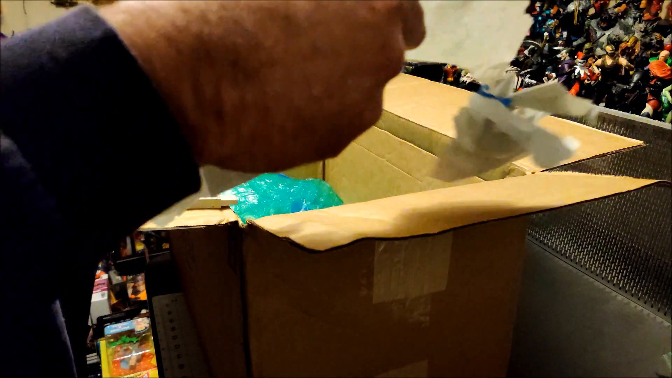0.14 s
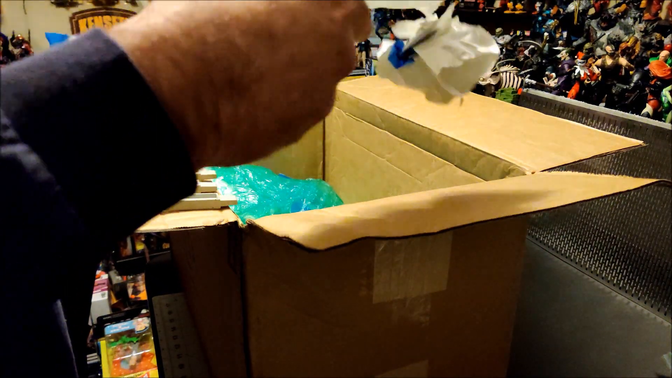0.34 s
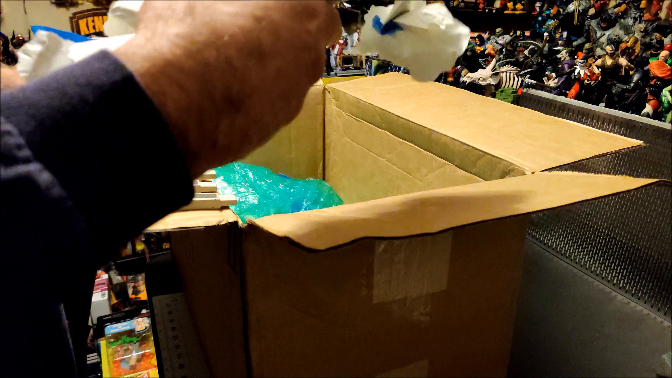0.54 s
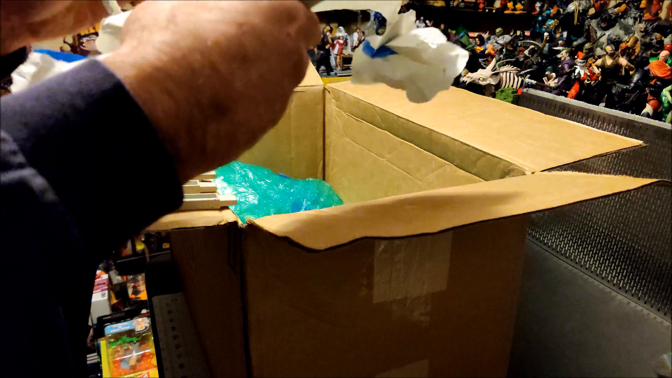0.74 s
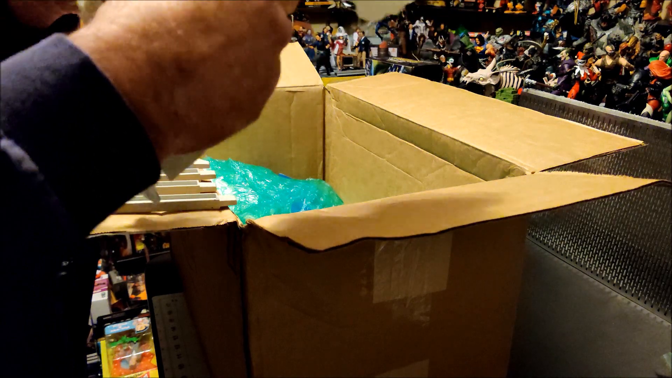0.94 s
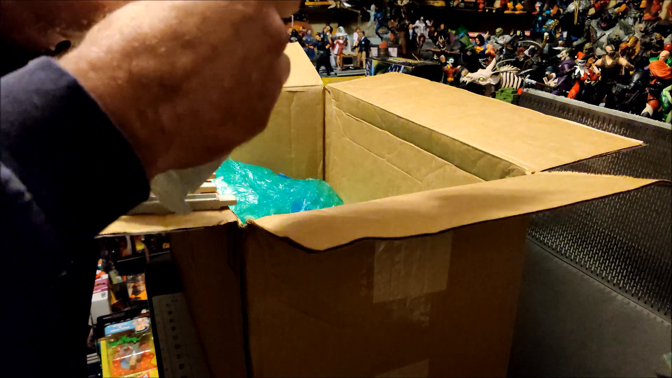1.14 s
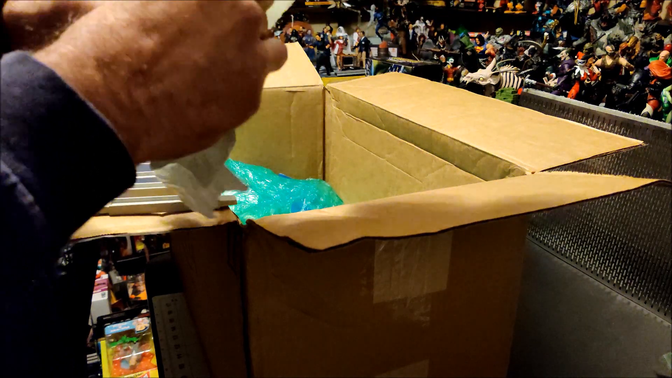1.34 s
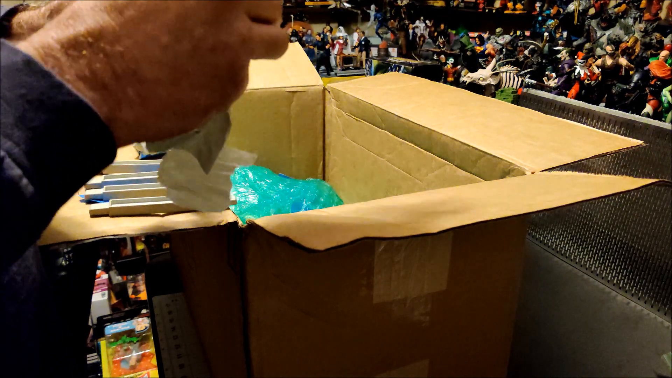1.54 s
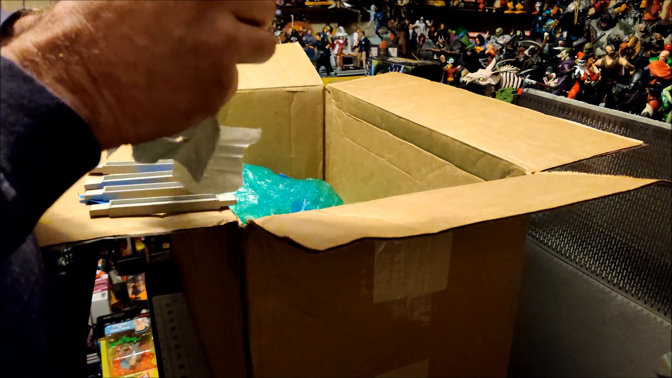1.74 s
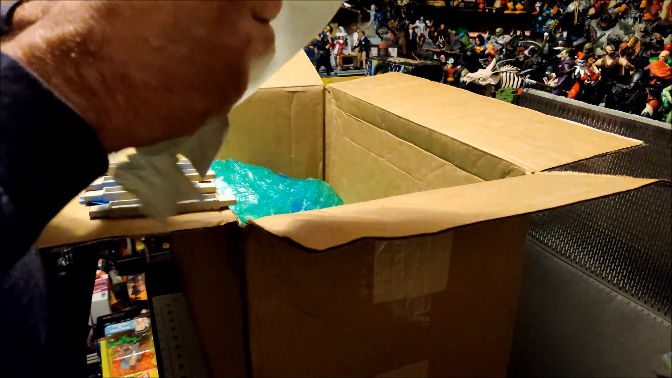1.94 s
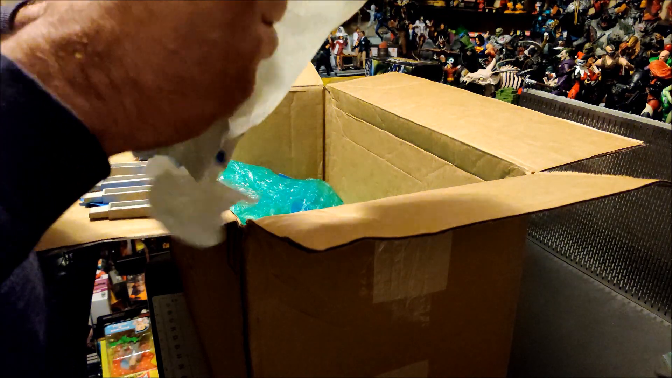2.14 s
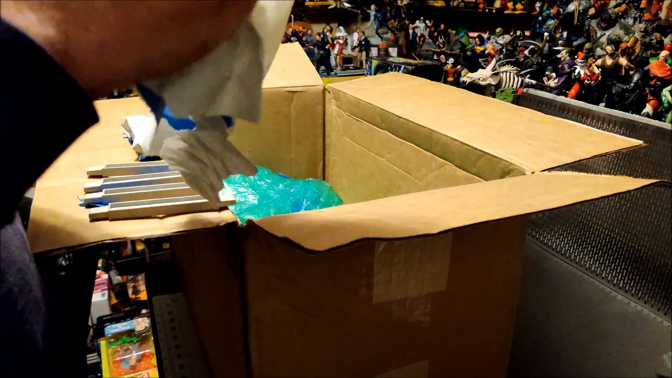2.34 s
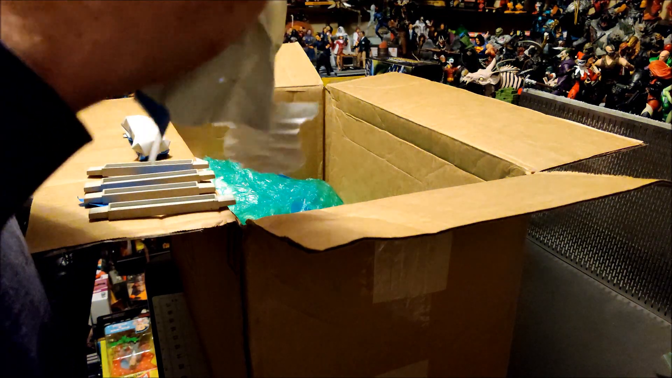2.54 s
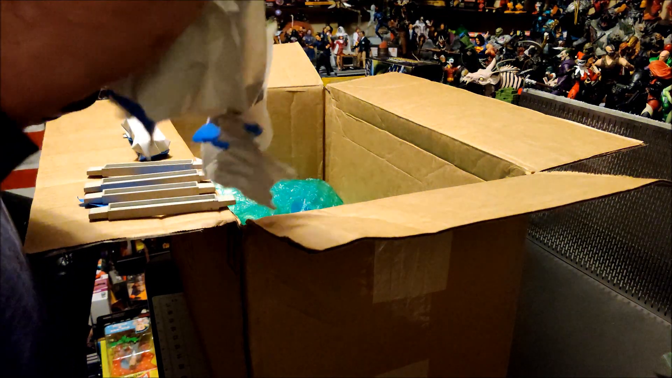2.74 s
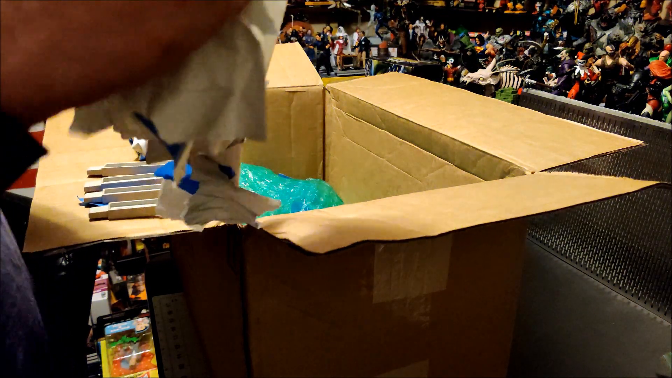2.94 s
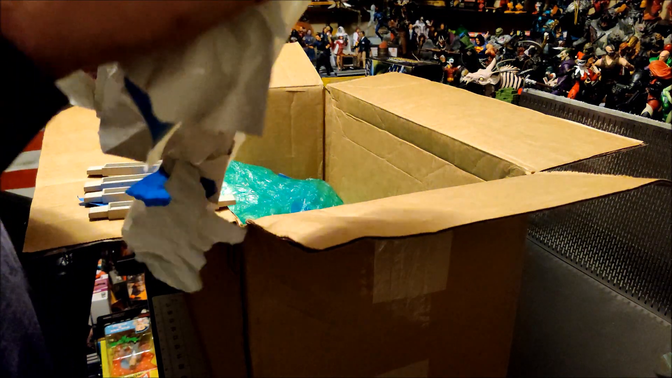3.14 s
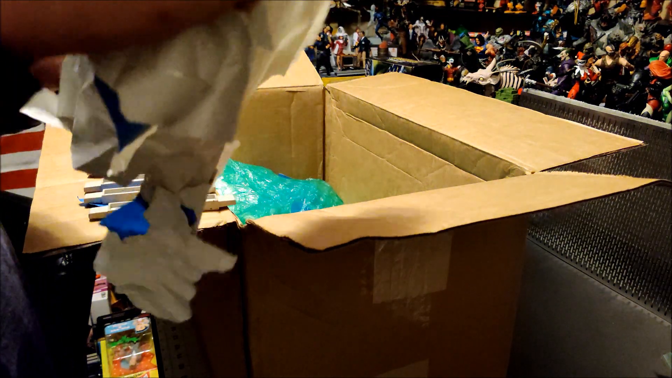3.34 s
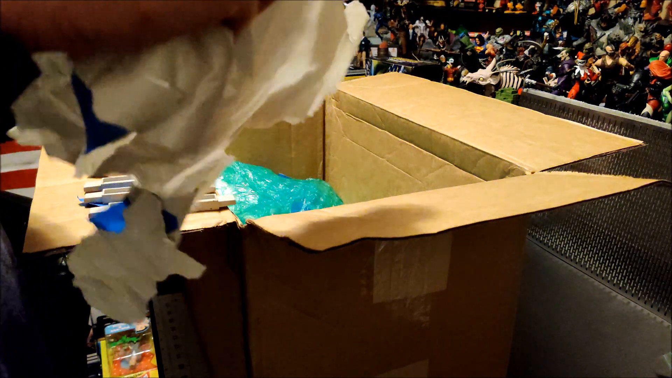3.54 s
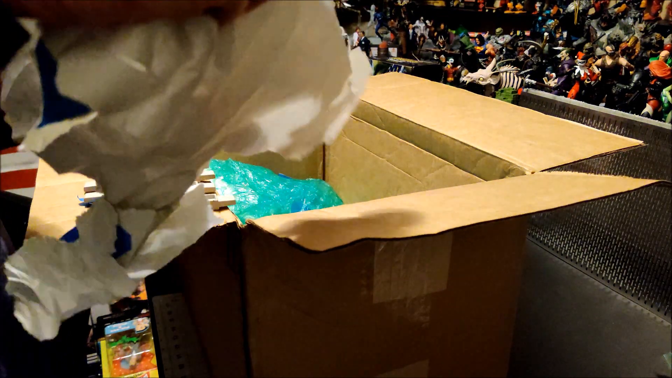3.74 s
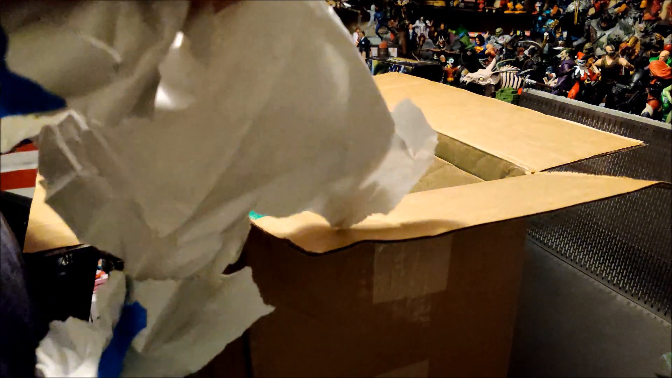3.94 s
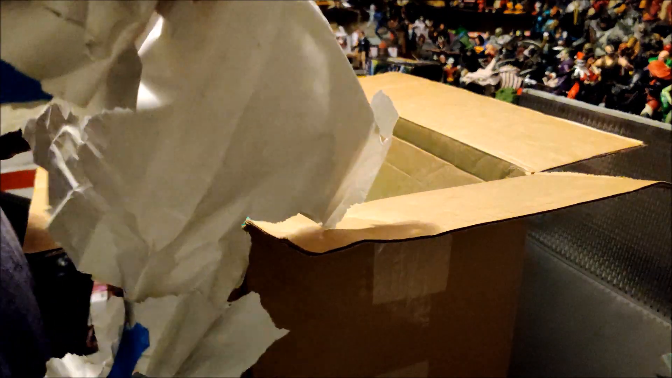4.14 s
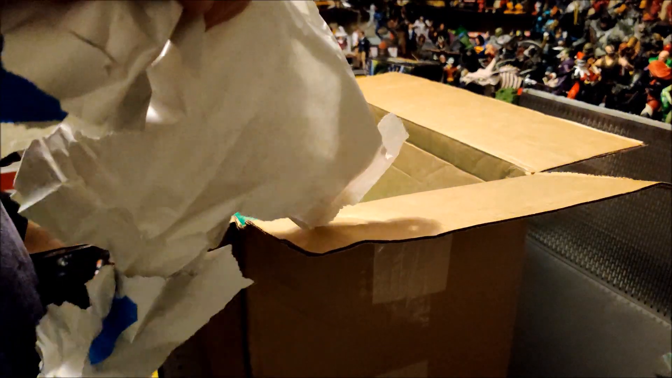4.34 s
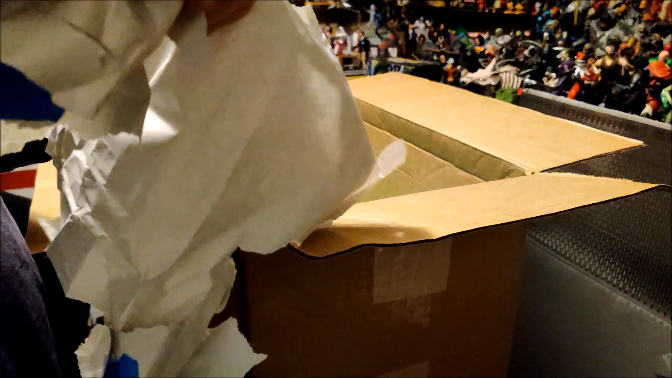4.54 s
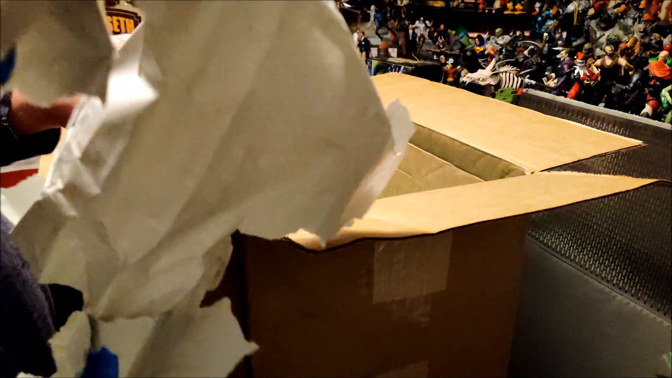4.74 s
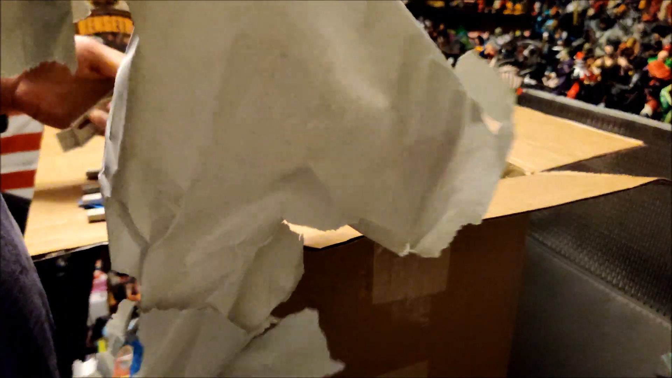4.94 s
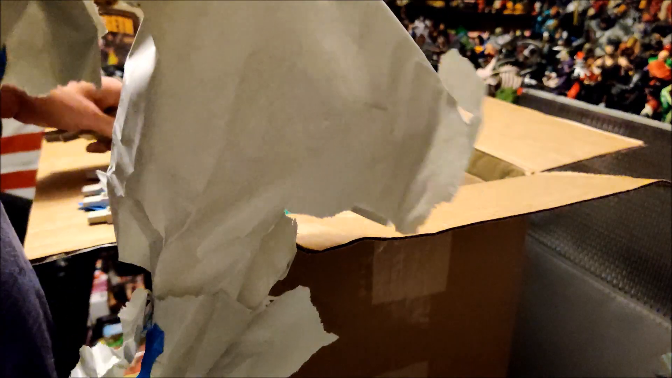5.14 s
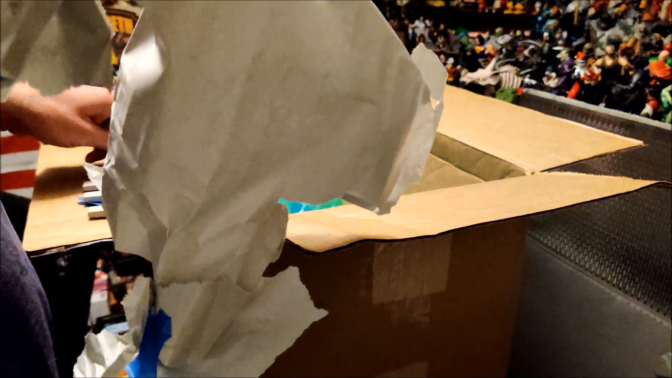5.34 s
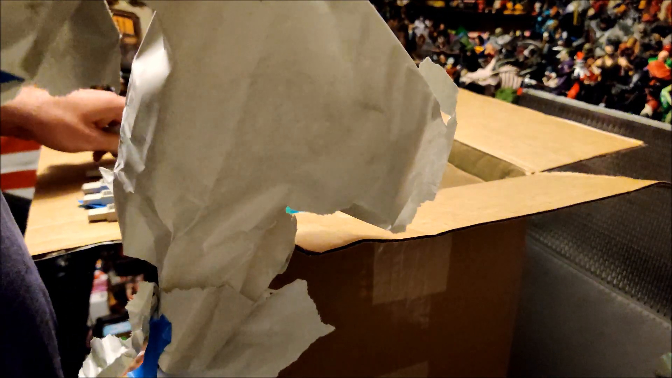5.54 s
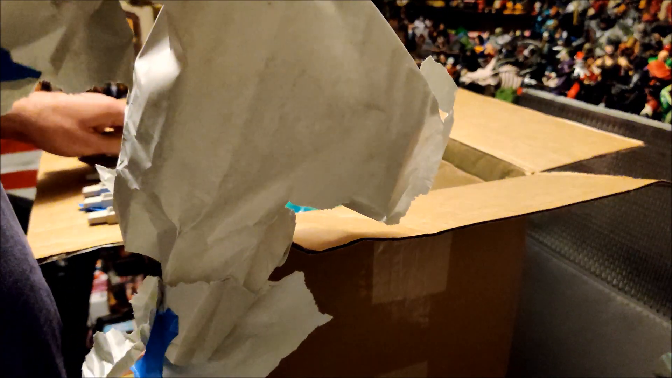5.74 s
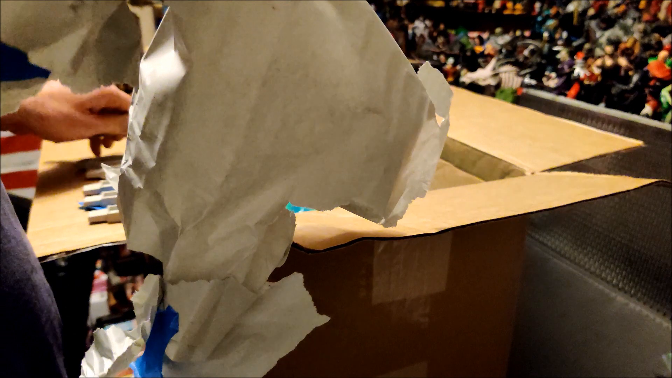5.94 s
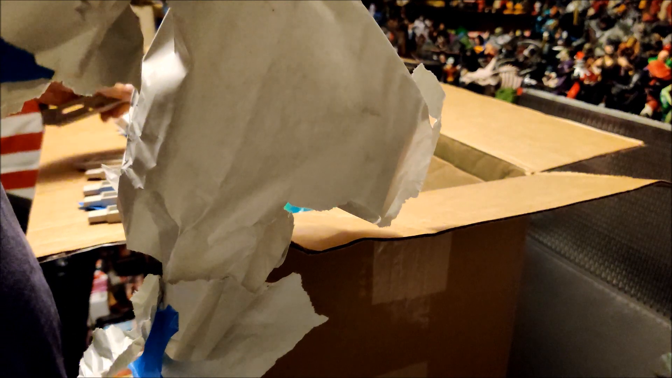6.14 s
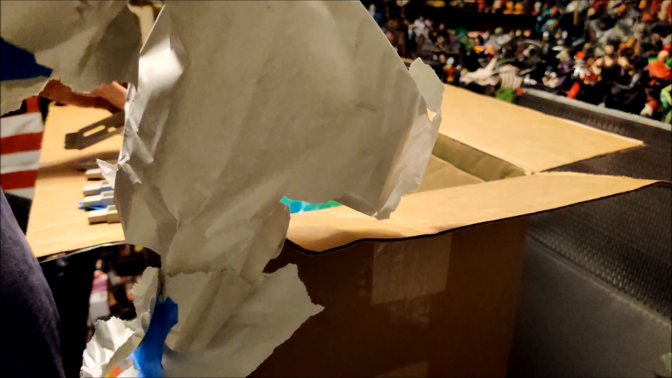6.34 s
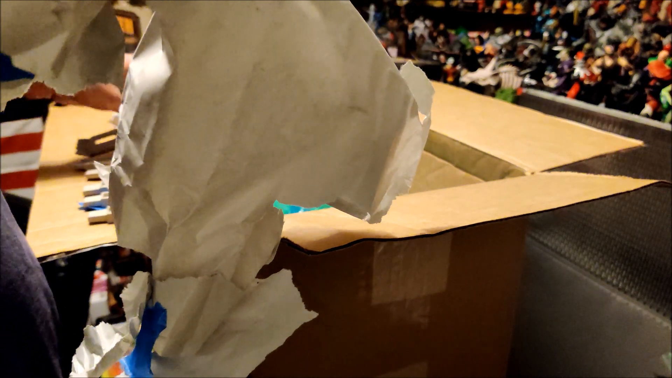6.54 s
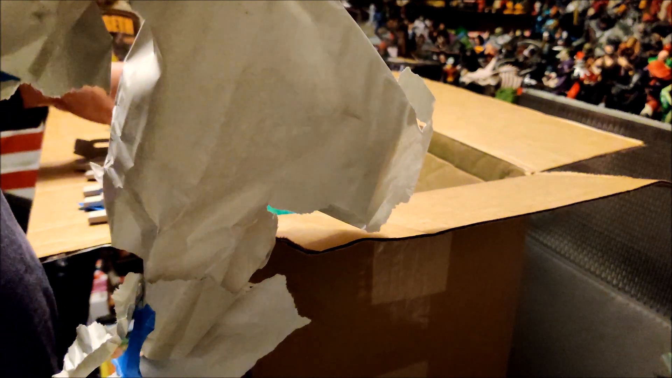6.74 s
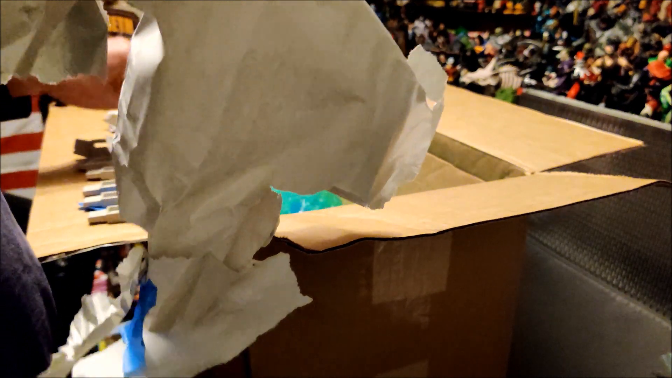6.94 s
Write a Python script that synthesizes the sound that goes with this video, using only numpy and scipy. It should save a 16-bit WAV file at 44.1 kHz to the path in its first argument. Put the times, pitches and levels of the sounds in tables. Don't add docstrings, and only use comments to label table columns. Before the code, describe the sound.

Packing paper handled by hand, heard close and slightly to the left, in a small room with short reverberation. Sparse ticks and rustle grow into loud, irregular crackling, ripping and crunching, with soft low puffs of air as the big sheet swings. The paper then falls silent; over faint hiss and hum, a few dull cardboard knocks, short scrapes and a tiny ringing clink remain.

```python
import sys
import numpy as np
from scipy import signal
from scipy.fft import rfft, irfft, next_fast_len
from scipy.io import wavfile
from scipy.ndimage import uniform_filter1d

SR = 44100
rng = np.random.default_rng(int(sys.argv[2]) if len(sys.argv) > 2 else 0)


def transcribe(signal):
    frames = np.atleast_2d(signal).T
    limited = np.clip(frames, -1, 1)
    pcm = np.round(limited * 32767).astype(np.int16)
    wavfile.write(sys.argv[1], SR, pcm)


def linear_from_db(decibels):
    return 10 ** (np.asarray(decibels, float) / 20)


N = 312661

# f/Hz, level/dB
HISS_SPECTRUM = [(12, -29), (20, 9), (123, -11), (172, -10.5), (590, -20.5), (1660, -24), (5080, -31),
                 (6180, -34), (12100, -28), (16000, -34)]
# f/Hz, level/dB rms
MAINS_LINES = [(119.5, -75), (240, -85), (600, -91), (720, -96)]
# f/Hz, level/dB per Hz
PAPER_SPECTRUM = [(25, -12), (45, -10), (100, -8), (300, -2), (550, -0.5), (1000, -1), (2800, 3.5),
                  (5000, -4.5), (8000, -14), (12000, -18), (16000, -29)]
# f/Hz, likeness/1
LIKENESS = [(30, .82), (250, 0.9), (600, 0.56), (2000, 0.3), (5000, 0.0), (7000, 0.4), (12000, 0.1)]
# f/Hz, level/dB
LEFT_OVER_RIGHT = [(60, 6.5), (150, 5), (380, 5.5), (950, 0), (2380, 2.5), (5300, 8), (7500, -1),
                   (15000, -1)]
# f/Hz, width/Hz, gain/dB
PORT_RESONANCES = [(3966, 490, -3), (4845, 600, 5), (5260, 550, 6), (6040, 1200, -3)]
# t/s, rustle level/dB
GRIP = [(0.0, -72.5), (0.24, -65.5), (0.75, -65), (0.9, -59), (1.24, -54), (1.5, -39.5), (2.1, -43),
        (2.35, -39), (2.51, -44.5), (2.76, -53), (3.11, -48), (3.35, -52), (3.55, -38), (4.1, -44),
        (4.5, -38), (4.86, -62), (5.12, -71), (5.33, -85)]
# peak t/s, rustle level/dB, rise/(s per 20 dB), fall/(s per 20 dB), flap re rustle/dB
TUGS = [(0.32, -61, .2, .2, -2), (1.6, -36, .15, .3, -2), (5.19, -57, .08, .25, 0),
        (4.98, -59, .01, .08, 3), (5.035, -59, .02, .1, -6), (5.09, -62, .02, .08, 4),
        (5.27, -60, .03, .08, -4), (4.78, -44, .02, .1, -6), (4.815, -44, .04, .08, -4),
        (0.5, -56, .25, .14, -6), (0.6, -56.5, .03, .14, 16), (1.03, -49.5, .3, .15, -5),
        (1.3, -44.5, .12, .3, -17), (1.76, -34.5, .5, .12, -7), (1.86, -26.5, .08, .34, -6),
        (2.27, -37, .5, .4, 2), (2.57, -29.5, .09, .17, -2), (2.94, -28.5, .11, .18, -4.5),
        (3.17, -33.5, .09, .25, -5), (3.47, -31.5, .11, .25, -8), (3.61, -28, .02, .65, -5),
        (3.97, -30.5, .45, .2, 0), (4.015, -34, .2, .12, -5), (4.255, -21.5, .07, .1, -4),
        (4.38, -31.5, .08, .5, 0), (4.63, -33.5, .25, .22, -1)]
# peak t/s, rustle level/dB, rise/(s per 20 dB), fall/(s per 20 dB)
SLIDES = [
    (5.356, -50, .003, .035),
    (5.6, -70, .5, .1),
    (5.736, -52, .004, .3),
    (5.856, -60, .4, .07),
    (5.964, -49, .004, .09),
    (6.462, -67.5, .008, .026),
    (6.644, -58, .12, .12),
    (6.822, -56, .014, .1),
    (7.08, -63, .15, .1),
]
# peak t/s, level/dB, rise/(s per 20 dB), fall/(s per 20 dB)
SWINGS = [
    (1.92, -54.5, .4, .4),
    (2.47, -52, .09, .09),
    (3.07, -48, .2, .06),
    (3.58, -49, .13, .9),
    (3.92, -51.5, .2, .5),
    (4.26, -40, .08, .09),
    (4.5, -50.5, .3, .08),
    (4.69, -48, .18, .3),
    (4.98, -57, .13, .11),
]
# peak t/s, level/dB, rise/(s per 20 dB), fall/(s per 20 dB)
RIPS = [(0.62, -64, .1, .3), (1.22, -51, .15, .3), (1.55, -39, .08, .2), (2.11, -39, .02, .15),
        (2.33, -35, .2, .2), (2.782, -40, .008, .3), (2.7, -50, .3, .2), (3.12, -47, .3, .2),
        (3.3, -46, .3, .4), (3.56, -45, .3, .2), (4.03, -36, .2, .15), (4.63, -38, .3, .18)]
# t/s, peak level/dB, ring f/Hz, crackle level/dB
PULLING_SNAPS = [(0.5019, -35, 2340, -29.5), (0.8301, -34, 2410, -32), (0.9169, -33, 2880, -29),
                 (1.1384, -30, 3530, -37), (1.1813, -33, 2570, -29), (1.2172, -26, 1430, -23.5),
                 (1.314, -23, 1460, -20.5), (1.3335, -21, 1850, -15), (1.3549, -21, 1210, -23),
                 (1.4123, -20, 1720, -20), (1.4527, -26, 2780, -28), (1.5211, -11, 3240, -16),
                 (1.7061, -25, 2220, -23.5), (1.746, -14, 3010, -17.5), (1.8343, -14, 1930, -14),
                 (1.8802, -9, 2600, -12), (1.9446, -10, 2720, -14), (2.0429, -22, 2190, -17),
                 (2.1082, -16, 1200, -22.5), (2.1431, -21, 2020, -19), (2.219, -19, 1720, -15.5),
                 (2.2714, -8, 2600, -6), (2.3267, -9, 2510, -3), (2.4165, -14, 1470, -16),
                 (2.4829, -22, 2370, -21), (2.5557, -16, 2640, -11), (2.631, -20, 1420, -14),
                 (2.7278, -26, 2450, -26), (2.7772, -17, 1450, -17), (2.8031, -17, 2750, -17.5)]
# t/s, peak level/dB, ring f/Hz, crackle level/dB
SPREADING_SNAPS = [(2.9119, -11, 3130, -13), (2.9733, -15, 1280, -23), (3.0037, -19, 1350, -19),
                   (3.0471, -19, 3000, -19), (3.1643, -20, 2590, -22), (3.1808, -16, 3150, -18),
                   (3.2082, -18, 3140, -23), (3.2661, -21, 2970, -17), (3.3624, -22, 3080, -25),
                   (3.4197, -18, 3320, -19), (3.4487, -21, 2960, -15), (3.4776, -12, 3310, -15),
                   (3.6003, -11, 3540, -12), (3.6702, -15, 3100, -19), (3.7355, -17, 1760, -22.5),
                   (3.7729, -9, 2760, -11), (3.8458, -22, 2420, -26), (3.8827, -14, 2590, -15),
                   (3.949, -18, 1030, -21), (3.971, -18, 1010, -23), (4.0104, -15, 2290, -13),
                   (4.1341, -18, 2000, -22), (4.178, -14, 3700, -21), (4.2169, -13, 3920, -17),
                   (4.3711, -21, 767, -18), (4.4933, -22, 2130, -19), (4.5666, -21, 3680, -27),
                   (4.5946, -20, 3610, -18), (4.636, -12, 3200, -7), (4.8959, -28, 1020, -37)]
# t/s, peak level/dB, ring f/Hz, treble re
# peak/dB
TICKS = [(0.3956, -50, 1910, -18), (0.4131, -40, 2820, -33), (0.8546, -41, 2130, -32),
         (1.0052, -34, 1940, -17), (1.2008, -33, 2910, -7), (1.5061, -22, 2030, -11),
         (1.6353, -24, 1770, -19), (1.8992, -13, 3150, -16), (2.2005, -24, 1270, -15),
         (2.3252, -12, 1310, -15), (2.5203, -24, 2300, -13), (2.5677, -14, 2600, -21),
         (2.7408, -25, 2640, -9), (2.8421, -21, 4240, -15), (2.9249, -8, 2950, -19),
         (3.4636, -16, 3740, -19), (3.5804, -24, 1670, -19), (3.6512, -18, 3060, -20),
         (3.7071, -22, 2770, -21), (3.8153, -22, 3090, -21), (3.9006, -15, 3710, -21),
         (4.2324, -13, 2730, -18), (4.4614, -23, 2280, -14), (4.5177, -24, 1710, -21),
         (4.7787, -35, 2460, -18), (4.8076, -32, 1260, -25), (4.9757, -43, 1420, -18),
         (5.0341, -45, 1460, -18), (5.1723, -49, 3290, -21), (5.266, -50, 1270, -25),
         (0.5064, -30, 2550, -16), (1.2896, -33, 2760, -19), (1.4601, -28, 2350, -18),
            (1.5325, -20, 3400, -13), (2.0533, -22, 2380, -11), (2.1672, -24, 1000, -12),
            (2.3308, -9, 2480, -14), (2.3776, -19, 1880, -6), (2.4061, -24, 900, -11),
            (2.5777, -17, 3150, -11), (2.6878, -29, 1090, -13), (2.7911, -20, 2050, -10),
            (2.8685, -25, 1170, -7), (2.9327, -14, 2520, -18), (3.0414, -20, 1230, -12),
            (3.1281, -29, 2780, -11), (3.1376, -31, 1690, -13), (3.2807, -22, 1600, -10),
            (3.6139, -13, 2570, -15), (3.6818, -17, 3050, -16), (3.758, -19, 4390, -19),
            (3.8343, -24, 1730, -16), (3.9091, -18, 810, -13), (4.2595, -13, 3790, -10),
            (4.4243, -22, 3190, -16), (4.4694, -23, 2570, -16), (4.5409, -25, 2990, -11),
            (4.6889, -21, 3430, -19), (4.8125, -28, 1100, -21)]
# t/s, peak level/dB, ring f/Hz
CRUNCHES = [(0.8302, -51, 480), (1.4909, -39, 780), (1.521, -33, 780), (1.574, -28, 520),
            (1.7168, -34, 510), (1.9446, -26, 760), (1.9958, -28, 500), (2.0411, -27, 250),
            (2.2178, -29, 450), (2.327, -19, 380), (2.4059, -31, 510), (2.4527, -33, 760),
            (2.4914, -35, 480), (2.5765, -27, 470), (2.6312, -31, 500), (2.6846, -34, 530),
            (3.0035, -32, 330), (3.1045, -40, 530), (3.4, -40, 560), (3.4365, -36, 400), (3.6268, -27, 500),
            (3.7529, -34, 720), (3.7797, -30, 620), (3.9073, -24, 710), (3.9486, -25, 340),
            (4.0146, -26, 330), (4.0627, -34, 610), (4.3836, -26, 740), (4.5701, -34, 580),
            (4.9752, -46, 600)]
# t/s, peak level/dB, tick re peak/dB, scuff/s, tilt/(dB per octave)
KNOCKS = [(0.27, -45.5, -20, 0.051, 1), (0.597, -32.5, -29, 0.045, -8), (4.803, -35, -17, 0.02, 5.5),
          (5.355, -28.5, -18, 0.012, 7), (5.733, -35, -19, 0.046, -7), (5.77, -50, -18, 0.037, -5),
          (5.858, -45.5, -21, 0.078, -7), (5.961, -28.5, -16, 0.054, -2.5), (6.657, -45.5, -18, 0.042, -8),
          (6.82, -29, -20, 0.045, -2.5), (7.065, -54.5, -18, 0.037, -6)]
# f/Hz, level/dB, t60/s
CARDBOARD_MODES = [(185, -3, .04), (285, 8, .07), (335, 3, 0.04), (403, -11, 0.02), (500, 6, 0.05),
                   (590, 5, 0.019), (700, 7, 0.035), (850, 3, 0.026), (1010, 0, 0.016), (1250, 6.5, 0.0067),
                   (1720, -1.5, 0.0037), (2030, 1, 0.005)]
# t/s, level/dB, f/Hz, t60/s
CLINKS = [
    (5.741, -43, 3770, 0.12),
    (5.744, -39, 3180, 0.12),
    (5.77, -38, 3750, .06),
    (5.81, -60, 1900, .08),
    (5.829, -37, 3580, 0.036),
    (5.833, -33, 2516, 0.14),
    (5.83, -53, 8760, .06),
    (5.865, -54, 3700, .12),
    (6.46, -61, 4940, 0.0038),
    (6.461, -53.5, 2490, .006),
]
BAND_EDGES_HZ = 22 * 2 ** np.arange(0, 9.7, .5)

HISS_DB = -68.5
GRIP_FLAP_DB, SLIDE_FLAP_DB, CRACKLE_FLAP_DB = -3.0, -9.0, -6.0
RUSTLE_FINE_DB, SLIDE_FINE_DB, CRACKLE_FINE_DB = -7.5, -12.0, -6.0
AIR_RE_GRIP_DB, AIR_DB_PER_GRIP_DB = -15.5, .9
CRACKLE_T60_S, CRACKLE_LAG_S = .16, .0043
FLURRIES_PER_S, FLURRY_T60_S, FLURRY_SHARE = 70, .04, .14
TREBLE_DB, TREBLE_DB_PER_OCTAVE = -19.5, -4.0
FINE_DB_PER_DB = .3
SNAP_LOW_CUT_HZ = 330
CRUNCH_S, CRUNCH_CYCLES, CRUNCH_DB = .006, 4.0, -1.5
WALL_CUT_HZ, ROOM_T60_S = 6000, 0.23
SHADE_HZ, RIGHT_LAG_S = 5800, .00018
TOP_CUT_HZ = 16100


def rms_one(x):
    return x / np.sqrt(np.mean(x ** 2) + 1e-20)


def at_hz(points, hz):
    table_hz, values = np.transpose(points)
    return np.interp(np.log(hz), np.log(table_hz + 1), values)


def drift(rate_hz, depth_db):
    r = np.exp(-80 * np.pi * rate_hz / SR)
    draws = rng.standard_normal(N // 40 + 2002)
    slow = signal.lfilter([1], [1, -2 * r, r * r], draws)[2000:]
    return np.interp(np.arange(N) / 40, np.arange(len(slow)), linear_from_db(depth_db * rms_one(slow)))


def decay(x, t60_s):
    return signal.lfilter([1], [1, -linear_from_db(-60 / (t60_s * SR))], x)


def ring(x, hz, t60_s):
    r, w = linear_from_db(-60 / (t60_s * SR)), 2 * np.pi * hz / SR
    return signal.lfilter([0, np.sin(w)], [1, -2 * r * np.cos(w), r * r], x + 1e-18)


def dying(t60_s, length_s):
    return linear_from_db(-60 * np.arange(int(length_s * SR)) / SR / max(t60_s, .002))


def band_pass(low_hz, high_hz):
    return signal.butter(2, [low_hz, high_hz], "band", fs=SR, output="sos")


def opposed(db):
    return linear_from_db(db * np.array([[1], [-1]]))


def add(out, at_s, sound):
    i = round(at_s * SR)
    out[..., i:i + sound.shape[-1]] += sound[..., :N - i]


def swells(rows):
    t, out = np.arange(0, N, 20) / SR, -120
    for at, db, rise_s, fall_s in rows:
        away = np.maximum((at - t) / rise_s, (t - at) / fall_s)
        out = np.maximum(out, db - 20 * away)
    return np.interp(np.arange(N) / SR, t, out)


def bands(source, spectrum, gain):
    out = np.zeros((2, N))
    for k, (low, high) in enumerate(zip(BAND_EDGES_HZ, BAND_EDGES_HZ[1:])):
        hz = np.sqrt(low * high)
        pair = signal.sosfilt(band_pass(low, high), source(k))
        alike = np.clip(at_hz(LIKENESS, hz), 0, 1)
        left = linear_from_db(at_hz(LEFT_OVER_RIGHT, hz) / 2)
        mid, side = np.sqrt(1 + alike), np.sqrt(1 - alike)
        mix = np.array([[left * mid, left * side], [mid / left, -side / left]])
        out += gain(hz) * (linear_from_db(at_hz(spectrum, hz)) * mix @ pair)
    return out


def quiet_room():
    white = rng.standard_normal((2, 2, N))
    hiss = linear_from_db(HISS_DB) * rms_one(bands(lambda k: white[k % 2], HISS_SPECTRUM, lambda hz: 1))
    t, hum = np.arange(N) / SR, np.zeros(N)
    for hz, db in MAINS_LINES:
        level = linear_from_db(db + 3) * drift(4, depth_db=1.5)
        hum += level * np.sin(2 * np.pi * hz * t + drift(2, depth_db=4))
    return hiss + hum * opposed(1.5)


def grains(per_s, spread_db, colour_db, smooth, smoother_up):
    born = np.flatnonzero(rng.random(N) < per_s * drift(40, depth_db=3.0) / SR)
    shape = (2, len(born))
    sizes = linear_from_db(spread_db * np.minimum(rng.exponential(1, shape), 2.6)) * rng.choice([-1, 1], shape)
    rub = rng.standard_normal((2, 2, N))

    def source(k):
        colour = linear_from_db(colour_db * np.clip(rng.standard_normal(len(born)), -2, 2))
        clicks = np.zeros((2, N))
        clicks[:, born] = sizes * colour
        clicks /= np.sqrt(np.sum(clicks[:, born] ** 2) / (2 * N))
        share = smooth * (BAND_EDGES_HZ[k] / 2000) ** smoother_up
        return (clicks + share * rub[k % 2]) / np.sqrt(1 + share ** 2)
    return source


def flurries():
    sizes = np.minimum(rng.exponential(1, N), 2.5)
    starts = (rng.random(N) < FLURRIES_PER_S / SR) * sizes
    jumps = decay(starts + 1e-18, FLURRY_T60_S)
    return rms_one(1 - FLURRY_SHARE + FLURRY_SHARE * rms_one(jumps))


def paper():
    grip_db = np.interp(np.arange(N) / SR, *np.transpose(GRIP))
    flicker = drift(25, depth_db=.78)
    paper_db = np.maximum(grip_db, swells([tug[:4] for tug in TUGS]))
    slide_db = swells(SLIDES)
    hand = linear_from_db(np.maximum(paper_db, slide_db)) * flicker

    fine_db = np.max([paper_db + RUSTLE_FINE_DB, slide_db + SLIDE_FINE_DB, swells(RIPS)], axis=0)
    fine = linear_from_db(fine_db) * flicker

    flaps = [(s, db + flap_db, rise, fall) for s, db, rise, fall, flap_db in TUGS]
    flaps += [(s, db + SLIDE_FLAP_DB, rise, fall) for s, db, rise, fall in SLIDES]
    flap = linear_from_db(np.maximum(grip_db + GRIP_FLAP_DB, swells(flaps))) * flicker

    grip_air_db = -44 + AIR_DB_PER_GRIP_DB * (grip_db + 44) + AIR_RE_GRIP_DB
    air = linear_from_db(np.maximum(grip_air_db, swells(SWINGS)) + 26.5)

    at, peak_db, snap_hz, crackle_db = np.transpose(PULLING_SNAPS + SPREADING_SNAPS)
    crackle_start = ((at + CRACKLE_LAG_S) * SR).astype(int)
    jumpy = flurries()

    def gain(hz):
        if hz < 120:
            return air * drift(8, depth_db=1.4)
        bright_db = (hz > 6000) * FINE_DB_PER_DB * (peak_db + 17)
        off_pitch_db = -5.55 * np.minimum(abs(np.log2(hz / snap_hz)), 1.5)
        starts = np.full(N, 1e-12)
        starts[crackle_start] = linear_from_db(crackle_db + bright_db - 13 + off_pitch_db)
        crackle = decay(starts, CRACKLE_T60_S * (2500 / hz) ** 0.093)
        if hz < 700:
            slow = uniform_filter1d(flap + linear_from_db(CRACKLE_FLAP_DB) * crackle, size=500, origin=200)
            return slow * linear_from_db(4.5) * drift(9.9, depth_db=1.5)
        if hz > 6000:
            bright = fine + linear_from_db(CRACKLE_FINE_DB) * crackle
            return bright * np.sqrt(jumpy) * linear_from_db(10.5) * drift(12, depth_db=1.5)
        return jumpy * (hand + crackle) * drift(15, depth_db=2.2)
    crinkle = grains(1200, spread_db=4.0, colour_db=4.5, smooth=.5, smoother_up=.45)
    return linear_from_db(4.0) * bands(crinkle, PAPER_SPECTRUM, gain)


def knocks():
    size = 9000
    out, t = np.zeros(N), np.arange(size) / SR
    noise = rng.standard_normal((len(KNOCKS), 2, size))
    for (at, peak_db, tick_db, scuff_s, tilt_db), (rough, hiss) in zip(KNOCKS, noise):
        effort = np.exp(-(t / scuff_s) ** 2) + 1.16 * dying(0.032, size / SR)
        contact = rough * abs(hiss) * effort
        body = np.zeros(size)
        for hz, db, t60_s in CARDBOARD_MODES:
            mode_db = db + (tilt_db + 6.5) * np.log2(hz / 600)
            body += linear_from_db(mode_db) * ring(contact, hz, t60_s)
        tick = signal.lfilter([1], [1, -1.2, .4], hiss * dying(0.01, size / SR))
        add(out, at, linear_from_db(peak_db) * (body / np.abs(body).max() + linear_from_db(tick_db) * tick))
    return signal.sosfilt(signal.butter(2, 190, "high", fs=SR, output="sos"), out)


def snaps():
    rows = TICKS
    for at, db, hz, _ in PULLING_SNAPS + SPREADING_SNAPS:
        treble_db = TREBLE_DB + TREBLE_DB_PER_OCTAVE * np.log2(hz / 2200) + FINE_DB_PER_DB * (db + 17)
        rows = rows + [(at, db, hz, treble_db)]
    out, t = np.zeros((2, N)), np.arange(600) / SR
    noise = rng.standard_normal((len(rows), 600))
    place = rng.standard_normal((len(rows), 2))
    treble = band_pass(6200, 10800)
    for (at, peak_db, hz, treble_db), rough, (pan, length) in zip(rows, noise, place):
        fall_s = .0016 * linear_from_db(1.5 * length)
        burst = rough * (1 - np.exp(-t / .0002)) * np.exp(-t / fall_s)
        crack = signal.sosfilt(band_pass(max(.6 * hz, 900), 4600), burst)
        body = .85 * rms_one(ring(burst, hz, 7 / hz)) + rms_one(crack)
        top = signal.sosfilt(treble, burst)
        snap = body / np.abs(body).max() + linear_from_db(treble_db - 1.5) * top / np.abs(top).max()
        add(out, at + .0005, linear_from_db(peak_db + .8) * snap * opposed(1.5 + 1.2 * pan))
    return signal.sosfilt(signal.butter(2, SNAP_LOW_CUT_HZ, "high", fs=SR, output="sos"), out + 1e-18)


def crunches():
    out, t = np.zeros(N), np.arange(2000) / SR
    noise = rng.standard_normal((len(CRUNCHES), 2000))
    for (at, peak_db, hz), rough in zip(CRUNCHES, noise):
        push = rough * t * np.exp(-t / CRUNCH_S * 3)
        sound = ring(push, hz, CRUNCH_CYCLES / hz)
        sound = ring(sound, hz * 1.1, CRUNCH_CYCLES / hz)
        add(out, at, linear_from_db(peak_db + CRUNCH_DB) * sound / np.abs(sound).max())
    out = signal.sosfilt(signal.butter(4, 190, "high", fs=SR, output="sos"), out + 1e-18)
    return out * opposed(2.2)


def clinks():
    out, noise = np.zeros(N), rng.standard_normal((len(CLINKS), 6000))
    for (at, db, hz, t60_s), rough in zip(CLINKS, noise):
        touch = rough * dying(.4 * t60_s, 6000 / SR)
        sound = ring(touch, hz, .6 * t60_s)
        add(out, at, linear_from_db(db) * sound / np.abs(sound).max())
    return out


def room(x):
    size = next_fast_len(N + SR)
    w = 2 * np.pi * np.arange(size // 2 + 1) / size
    dull = np.exp(-2 * np.pi * WALL_CUT_HZ / SR)
    wall = (1 - dull) / (1 - dull * np.exp(-1j * w))
    response = [0, 0]
    lags = (rng.uniform(.008, .035, 12) * SR).astype(int)
    for k, lag in enumerate(lags):
        loop = linear_from_db(-60 * lag / SR / ROOM_T60_S) * wall * np.exp(-1j * w * lag)
        response[k % 2] = response[k % 2] + loop / (1 - loop) * (-1) ** (k // 2)
    return irfft(rfft(x, size) * np.array(response), size)[:, :N]


def scene():
    floor = quiet_room()
    rustle = paper()
    items = knocks() + clinks()
    near = rustle + snaps() + crunches() + items * opposed(1.5)
    low = signal.sosfiltfilt(signal.butter(4, SHADE_HZ, "low", fs=SR, output="sos"), near[1])
    high = signal.sosfiltfilt(signal.butter(4, SHADE_HZ, "high", fs=SR, output="sos"), near[1])
    near[1] = high + np.roll(low, round(RIGHT_LAG_S * SR))
    return near + room(linear_from_db(-16) * near.mean(0) + linear_from_db(-28) * items) + floor


def top_cut(x):
    return signal.sosfilt(signal.butter(12, 16700, fs=SR, output="sos"), x)


def record(dry):
    for hz, width_hz, db in PORT_RESONANCES:
        w, q, g = 2 * np.pi * hz / SR, np.pi * width_hz / SR, linear_from_db(db / 2)
        zeros = [1 + q * g, -2 * np.cos(w), 1 - q * g]
        poles = [1 + q / g, -2 * np.cos(w), 1 - q / g]
        dry = signal.lfilter(zeros, poles, dry)
    mix = signal.sosfilt(signal.cheby2(10, 30, TOP_CUT_HZ, fs=SR, output="sos"), dry)
    return top_cut(mix)


dry = scene()
out = record(dry)
transcribe(out)
```